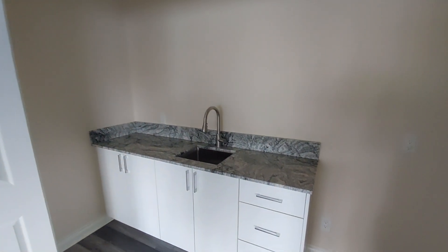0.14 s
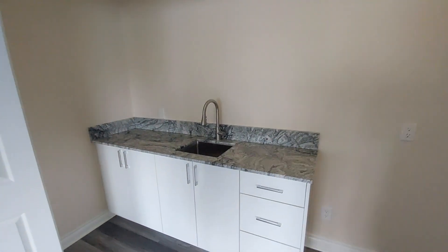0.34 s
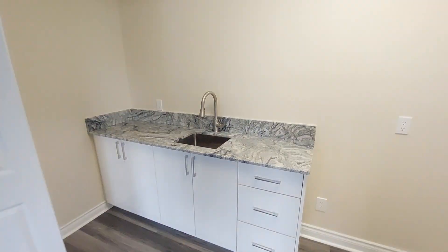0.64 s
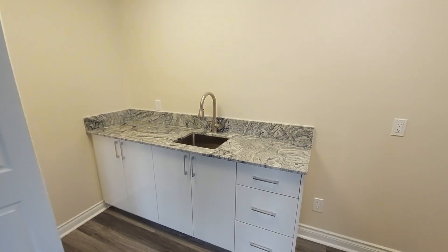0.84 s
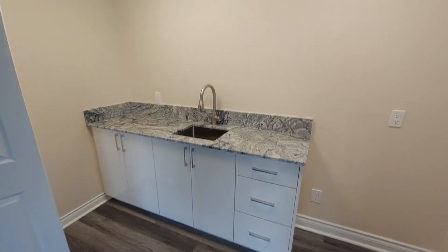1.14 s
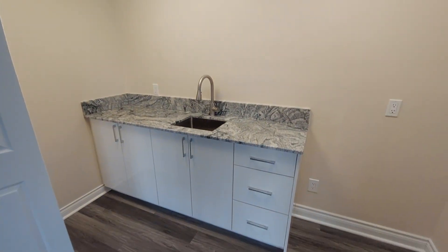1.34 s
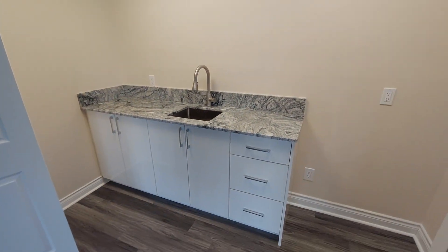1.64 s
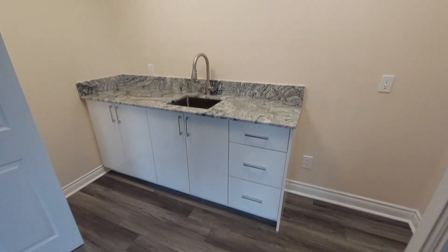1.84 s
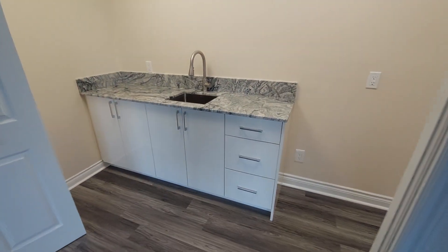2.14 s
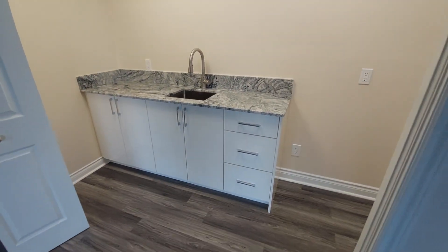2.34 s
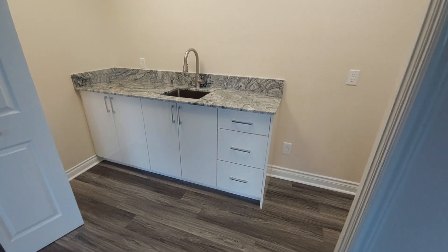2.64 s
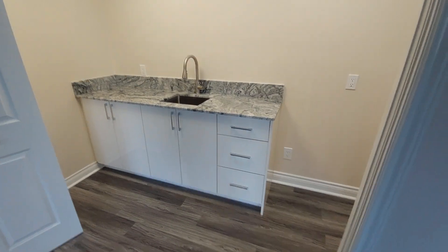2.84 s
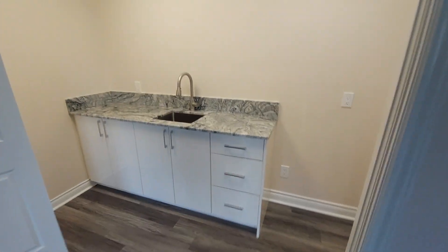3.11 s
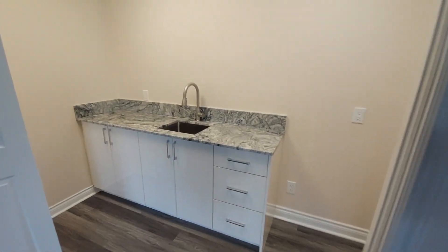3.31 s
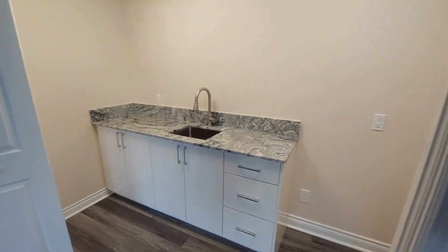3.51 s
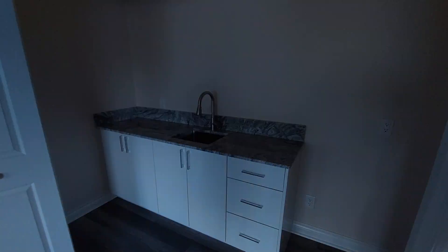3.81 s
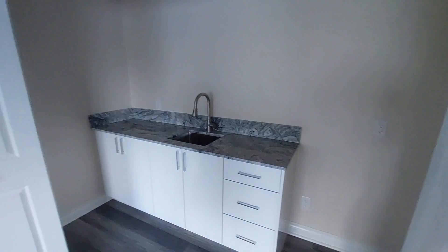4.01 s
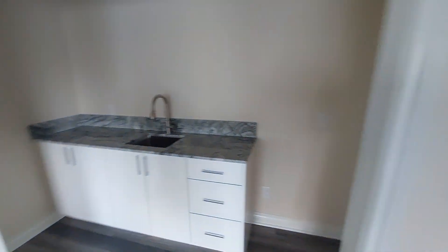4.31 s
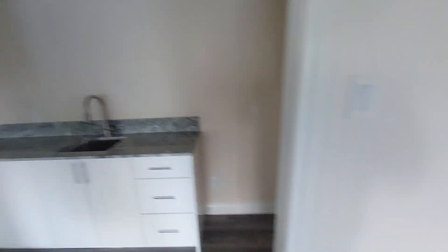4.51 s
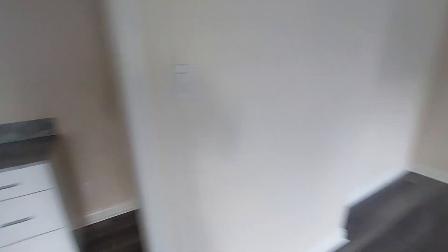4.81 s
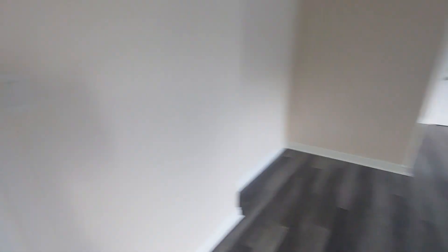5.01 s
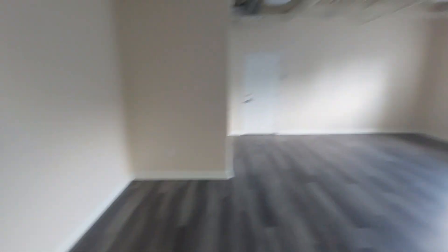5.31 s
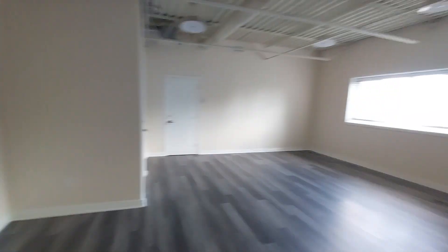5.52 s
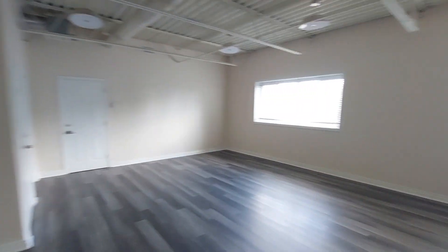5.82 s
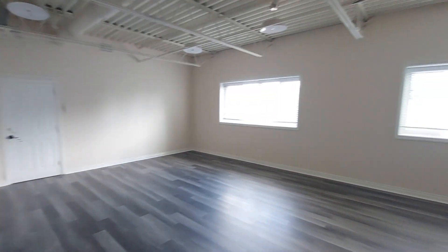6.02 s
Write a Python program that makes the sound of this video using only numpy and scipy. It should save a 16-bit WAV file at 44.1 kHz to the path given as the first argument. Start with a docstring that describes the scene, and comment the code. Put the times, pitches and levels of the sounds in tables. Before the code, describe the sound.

The dull ring of a switch fades in a bare room as close finger clicks and scrapes start on the left side of a handheld microphone. Slow, irregular footsteps knock and thump on a laminate floor. Past the middle come a light knock on a hollow wall and a crisp, echoing switch snap. Then a sleeve swishes, floor joints click and the grip slips loudly once more. Ventilation hums faintly throughout.

```python
"""Footsteps wander about an empty, echoing room: heels knock on laminate and the floor thumps.
The walker holds a recorder, so fingers tick, rub and creak on its case right beside the left microphone.
A dull switch snap rings away at the start; later a hand meets the hollow wall and a bright snap sets
the room ringing. Underneath lie the rustle of a sleeve and a faint ventilation hum."""
import sys
import numpy as np
from scipy import signal
from scipy.fft import rfft, irfft, next_fast_len
from scipy.io import wavfile

SR = 44100
rng = np.random.default_rng(int(sys.argv[2]) if len(sys.argv) > 2 else 0)


def master_out(mix):
    """Clip the mix to full scale and print it as 16-bit PCM to the path in sys.argv[1]."""
    frames = np.transpose(np.atleast_2d(mix))
    ceiling = np.clip(frames, -1, 1)
    pcm = np.round(ceiling * 32767).astype(np.int16)
    wavfile.write(sys.argv[1], SR, pcm)


N = 271215
T = np.arange(N) / SR

# Ring of the bare room. Each row: frequency in Hz, seconds to die away by 60 dB.
ROOM_DECAY = [(100, 1.25), (300, 1.06), (700, 1.11), (1700, 2.14), (3500, 1.544), (6500, 1.26),
              (12000, 0.71)]
# Stereo width of noise. Each row: frequency in Hz, likeness of left and right from 0 to 1.
STEREO_LIKENESS = [(50, 0.61), (200, 0.59), (500, 0.65), (1000, 0), (3000, 0), (16000, 0)]
# Colour of the ventilation's air. Each row: frequency in Hz, level in dB.
AIR_SPECTRUM = [(25, -24.5), (55, 2), (85, -3.5), (120, 3), (170, -4.5), (260, -4.5), (400, -14.5),
                (700, -28), (1800, -28), (3500, -31), (9000, -32), (16000, -34)]
# How much ventilation reaches the walker. Each row: time in seconds, level in dB.
VENT_REACH = [(0, -3), (.8, -2), (2.6, -0.5), (3.4, -0.5), (4.3, -3.5), (4.8, -7), (6.15, -8)]
# Colour of the sleeve's cloth. Each row: frequency in Hz, level in dB.
CLOTH_SPECTRUM = [(500, -5), (1000, 1), (1600, 8.5), (2800, 0.5), (4200, 2), (5700, -0.5), (7500, 0.5),
                  (9200, -7.5), (12000, 2), (16000, -1.5)]
# Swings of the arm. Each row: start in seconds, length in seconds, level in dB, left over right in dB.
ARM_SWINGS = [(0.322, 0.16, -68, -2), (1.785, 0.32, -65, 5), (2.044, 0.28, -57.5, 4.5),
              (2.588, 0.05, -63.5, 11), (3.533, 0.64, -54, 6.5), (4.173, 0.23, -65, -4),
              (4.528, 0.39, -58.5, -1), (4.849, 0.23, -54, 1.5), (5.094, 0.1, -53.5, -1),
              (5.52, 0.29, -59, 6), (5.658, 0.32, -61, 4), (5.92, 0.24, -50, 2.5)]
# The grip tightens. Each row: start in seconds, end in seconds, level in dB.
CASE_CREAKS = [(0.587, 0.608, -54.5), (1.408, 1.485, -51), (1.773, 1.798, -59), (2.886, 2.985, -43)]
# Fingers slide. Each row: start in seconds, end in seconds, level in dB, hiss over scrape in dB.
FINGER_RUBS = [(0.647, 0.771, -50.5, -3.5), (0.734, 0.852, -53, -10), (.815, .948, -38.5, -18),
               (1.004, 1.1, -56, -5.5), (1.396, 1.475, -53.5, -8), (1.773, 1.802, -44.5, -7),
               (1.94, 2.089, -54.5, 3), (2.623, 2.724, -52.5, -1.5), (2.892, 2.981, -50, -6),
               (5.387, 5.461, -47, -2)]
# A nail catches an edge of the case. Each row: start in seconds, level in dB.
NAIL_CATCHES = [(.594, -30), (.6663, -11), (5.3218, -28), (5.372, -11.5)]
# The grip slips. Each row: start in seconds, level in dB, ring pitch in Hz, crack over ring in dB.
GRIP_SLIPS = [(.1199, -20, 1710, -22), (.361, -23.5, 1870, -32), (0.7425, -14.5, 1290, -18),
              (0.8301, -25.5, 1310, -27), (0.8372, -24.5, 1310, -17), (1.303, -22.5, 1620, -4),
              (1.3448, -27, 1700, -10.5), (1.4112, -20, 1700, -6.5), (1.4161, -27.5, 1700, -9),
              (1.429, -25, 1730, -9), (1.4476, -19, 1490, -13), (1.4698, -14.5, 1500, -10.5),
              (1.7792, -25.5, 1520, -7), (1.7807, -24, 1810, -8.5), (2.1773, -21.5, 1450, -11.5),
              (2.2886, -27, 1500, -9), (2.6451, -28.5, 1350, -23), (2.8613, -22, 1660, 0),
              (2.8933, -21, 1920, 0), (2.9115, -20, 1700, 3), (2.9407, -28, 1410, -23),
              (2.9597, -19.5, 1870, -8.5), (5.233, -21.5, 1673, -3.5), (5.4199, -16.5, 1380, -2),
              (5.4306, -2.5, 880, -9.5), (5.438, -19.5, 1700, -20)]
# The hollow wall. Each row: resonance in Hz, width in Hz, level in dB.
WALL_RESONANCES = [(650, 28, 1.5), (736, 15.6, 7.5), (767, 62, -1), (1500, 1200, -16), (2420, 430, -10.5),
                   (2867, 220, -9.5), (3760, 390, -6), (5630, 1100, -16.5), (6780, 610, -12.5),
                   (12600, 2600, -22.5)]
# Light knocks on wall and door frame. Each row: start in seconds, level in dB.
WALL_KNOCKS = [(3.5797, -32), (3.589, -33.5), (4.862, -53.5)]
# A switch and its plate. Each row: resonance in Hz, width in Hz, level in dB.
SWITCH_RESONANCES = [(416, 84, -0.5), (1700, 540, -1), (2954, 670, 0.5), (3500, 370, 6.5), (4150, 197, 7),
                     (4480, 690, 0.5), (5384, 650, 2.5), (6294, 110, 11.5), (6523, 170, 8), (7630, 450, 3),
                     (8480, 190, -8.5), (10520, 1100, -5.5), (12030, 750, 0), (14700, 2500, -7.5)]
# Two switch snaps: a duller one ringing away at the start, then a bright one.
# Each row: start in seconds, level in dB, brightness as a cutoff in Hz.
SWITCH_SNAPS = [(-.36, -12, 4000), (3.829, -15, 15300)]
# Plank joints click. Each row: start in seconds, level in dB.
JOINT_CLICKS = [(5.0479, -37), (5.0711, -32)]
# Weight lands on the floor or pushes on the wall.
# Each row: start in seconds, level in dB, swell time in seconds, left over right in dB.
WEIGHT_THUMPS = [(2.217, -39, .014, 22.5), (2.283, -43.5, 0.0078, 18), (3.596, -41.5, .026, 1.5),
                 (3.841, -38, .033, 0), (4.48, -47.5, .018, -10), (4.559, -49.5, .008, -14),
                 (5.139, -52, .018, 8), (5.439, -56, .023, 28), (5.565, -53, .014, 21)]
# Heels on the planks. Each row: start in seconds, level in dB, brightness as a cutoff in Hz.
HEEL_STRIKES = [(-.1, -44, 557), (2.0794, -26.5, 1700), (3.0749, -56.5, 820), (3.579, -43.5, 690),
                (3.835, -38, 590), (4.461, -52.5, 840), (5.048, -52, 590), (5.202, -48.5, 860),
                (5.2928, -35, 1700), (5.928, -44, 660)]


def from_db(db):
    """Decibels as a gain."""
    return 10 ** (np.asarray(db) / 20)


def rms_one(x):
    """Scale to an rms of 1."""
    return x / np.sqrt(np.mean(x ** 2) + 1e-20)


def peak_one(x):
    """Scale to a peak of 1."""
    return x / np.abs(x).max()


def at_hz(points, hz):
    """Read a curve along a logarithmic frequency axis."""
    freqs, values = np.transpose(points)
    return np.interp(np.log(hz + 1), np.log(freqs), values)


def pan(db):
    """Stereo gains that put the left db above the right."""
    return from_db(np.array([[db], [-db]]) / 2)


def cut(x, hz, kind, order=2):
    """A low-pass or high-pass filter."""
    return signal.sosfilt(signal.butter(order, min(hz, .45 * SR), kind, fs=SR, output="sos"), x)


def resonate(x, hz, width_hz):
    """A resonance with gain 1 on top."""
    return signal.lfilter(*signal.iirpeak(min(hz, .45 * SR), hz / width_hz, fs=SR), x)


def resonate_twice(x, hz, width_hz):
    """Two like resonances in series: a softer attack and steeper skirts."""
    return resonate(resonate(x, hz, width_hz), hz, width_hz)


def click(size=4096):
    """One clean contact."""
    return signal.unit_impulse(size) + 1e-18


def burst(decay_s, size=4096):
    """A quickly dying spatter of tiny contacts, even in colour; energy 1."""
    fade = np.exp(-T[:size] / decay_s)
    phases = np.angle(rfft(rng.standard_normal(size) * fade))
    spatter = irfft(np.exp(1j * phases), size) * fade ** .25
    return spatter / np.linalg.norm(spatter)


def struck(contact, modes):
    """The modes of a body, rung by one contact; peak 1."""
    return peak_one(sum((-1) ** k * from_db(db) * resonate(contact, hz, width)
                        for k, (hz, width, db) in enumerate(modes)))


def add(out, s, sound):
    """Mix a sound in at s seconds; it may begin before the scene does."""
    at = round(s * SR)
    part = sound[:, max(-at, 0):N - at]
    out[:, max(at, 0):max(at, 0) + part.shape[1]] += part


def noise(spectrum, size=N):
    """Coloured stereo noise of rms 1, narrower in the bass."""
    n = next_fast_len(size)
    hz = np.arange(n // 2 + 1) * SR / n
    alike = np.clip(at_hz(STEREO_LIKENESS, hz), 0, 1)
    mid, side = rfft(rng.standard_normal((2, n)))
    both = np.sqrt(1 + alike) * mid + np.sqrt(1 - alike) * side * [[1], [-1]]
    return rms_one(irfft(both * from_db(at_hz(spectrum, hz)), n)[:, :size])


def room(x, near_db, near_t60, far_db, size=80000):
    """Dense echoes of the nearby walls, then the long ring of the whole room, dying band by band."""
    t = T[:size]
    white = rfft(noise([(20, 0), (20000, 0)], size=size))
    octave = np.log2(np.maximum(np.arange(white.shape[1]) * SR / size, 110) / 110)
    far = 0
    for k in range(9):
        band = irfft(white * (np.round(octave) == k), size)
        far = far + band * from_db(-60 * t / at_hz(ROOM_DECAY, 110 * 2 ** k))
    near = irfft(white, size) * from_db(-60 * t / near_t60)
    build_up = 1 - np.exp(-t / 0.005)
    echo = (from_db(near_db) * near + from_db(far_db) * far) * build_up / np.sqrt(SR / 20)
    return signal.fftconvolve(x[None], echo, axes=1)


def ventilation():
    """A fan tone and a mains tone waver over a soft rush of air, fading as the walker turns away."""
    fan_hz, mains_hz = 113.2, 240.3
    reach_db = np.interp(T, *np.transpose(VENT_REACH))
    out = from_db(-66.5 + 0.68 * reach_db) * noise(AIR_SPECTRUM) * pan(6.2)
    for hz, db, fade_depth, side_db in [(fan_hz, -65.5, 1.0, 7), (mains_hz, -68, 2.9, 2)]:
        waver = rms_one(resonate_twice(rng.standard_normal(N + SR), hz, 22)[SR:])
        tone = rms_one(np.sin(2 * np.pi * hz * T) + 0.35 * waver)
        out = out + from_db(db + fade_depth * reach_db) * tone * pan(side_db)
    return out


def sleeve():
    """Each swing of the arm is a swish of cloth that rises fast and dies away, brighter on the right."""
    rise_share, fall_db = 0.16, 9.5
    stir_db, moving_from_s = -69.5, 2.4  # cloth stirs faintly between the swings
    power = from_db(stir_db) ** 2 * (T > moving_from_s)
    for start, length, db, side_db in ARM_SWINGS:
        progress = np.maximum(T - start, 0) / length
        rise = np.minimum(progress / rise_share, 1)
        fall = np.maximum(progress - rise_share, 0) / (1 - rise_share)
        swish = rise * from_db(db - fall_db * np.minimum(fall, 4) ** 2)
        power = power + (swish * pan(side_db)) ** 2
    left, right = np.sqrt(power) * noise(CLOTH_SPECTRUM)
    return np.array([cut(left, 11000, "low"), right])


def pressure(length_s):
    """Finger pressure swells over a stroke and eases off after it."""
    swell = signal.windows.tukey(max(int(length_s * SR), 256), alpha=0.65)
    return cut(np.pad(swell, (0, 2048)), 58, "low", order=1)


def scrape(hz, size):
    """Dense uneven slips through one broad resonance; rms 1."""
    slips_per_s, spread_db = 9000, 4.1
    slips = rng.standard_normal((2, size)) * (rng.random(size) < slips_per_s / SR)
    slips *= from_db(spread_db * rng.standard_normal(size))
    rung = cut(resonate_twice(slips, hz, width_hz=hz), 1.715 * hz, "low", order=3)
    return rms_one(cut(rung, 0.45 * hz, "high", order=1))


def creaks():
    """The squeezed case creaks low with a faint rasp, and both microphones hear it."""
    out = np.zeros((2, N))
    for start, end, db in CASE_CREAKS:
        squeeze = pressure(end - start)
        groan = scrape(hz=410, size=len(squeeze))
        rasp = from_db(-8) * scrape(hz=1180, size=len(squeeze))
        add(out, start, squeeze * from_db([[db], [db - 4.5]]) * (groan + rasp))
    return out


def rubs():
    """Sliding skin scrapes through the left microphone port's resonance, with a fine hiss on top."""
    out = np.zeros((2, N))
    for start, end, db, hiss_db in FINGER_RUBS:
        stroke = pressure(end - start)
        hiss = noise([(600, -10), (2500, 9.5), (5500, 5), (9000, -1), (13000, 1), (16000, -7)],
                     size=len(stroke))
        rub = scrape(hz=1520, size=len(stroke)) + from_db(hiss_db) * hiss
        add(out, start, stroke * from_db([[db], [db - 47]]) * rub)
    return out


def nail_clicks():
    """A nail catches the case: a thin, very high click on the left."""
    out = np.zeros((2, N))
    for s, db in NAIL_CATCHES:
        edge = resonate(click() + 0.18 * burst(0.00097), hz=12800, width_hz=3300)
        thin = peak_one(cut(edge, 5100, "high", order=6))
        add(out, s, from_db(db) * thin * from_db([[0], [-34]]))
    return out


def grip_ticks():
    """Skin slips on the case: a brief ring, a crack and a push of air on the left, a thud on both sides."""
    usual_db, usual_width_hz = -23.5, 940
    out = np.zeros((2, N))
    thud = peak_one(resonate_twice(click(), hz=424, width_hz=480))
    push = peak_one(cut(resonate(click(), hz=390, width_hz=380), 900, "low"))
    for s, db, hz, crack_db in GRIP_SLIPS:
        # a firmer finger damps the ring; so does a slip with less crack, as the skin stays on the case
        width_hz = usual_width_hz * from_db(0.24 * (db - usual_db) - 0.12 * crack_db)
        ring = peak_one(resonate_twice(click(), hz, width_hz))
        # slow slips are round at the top and move the most air
        ring = peak_one(cut(ring, 2.24 * hz, "low", order=3))
        air = from_db(-14) * (1000 / hz) ** 2.2 * push
        edge = click() + 0.53 * burst(0.0012)
        crack = peak_one(cut(cut(edge, 3750, "high", order=4), 3700, "low", order=1))
        tick = ring + air + from_db(crack_db) * crack
        add(out, s, from_db(db) * tick * from_db([[0], [-34]]))
        add(out, s + 0.00068, from_db(-41.5 + 0.8 * crack_db) * thud * pan(-1))
    return out


def wall_knocks():
    """A hand meets the hollow wall, and the room answers."""
    out = np.zeros((2, N))
    for s, db in WALL_KNOCKS:
        knock = from_db(db) * struck(burst(0.0017), WALL_RESONANCES)
        add(out, s, knock * pan(0))
        add(out, s, room(knock, near_db=6, near_t60=0.44, far_db=2.5) * pan(1))
    return out


def switch_snaps():
    """A rocker snaps over, chatters for a few milliseconds and sets the room ringing."""
    out = np.zeros((2, N))
    for s, db, bright_hz in SWITCH_SNAPS:
        chatter = struck(burst(0.0084), SWITCH_RESONANCES)
        snap = from_db(db) * cut(chatter, bright_hz, "low", order=3)
        add(out, s, snap * pan(-4))
        # the sharpest treble lands far to the right
        sizzle = cut(burst(0.0023), 10700, "high", order=4)
        add(out, s, from_db(db + 14) * sizzle * from_db([[-14], [8]]))
        # the walls return the ring of the plate from all sides
        plate = struck(click(), SWITCH_RESONANCES)
        plate *= np.linalg.norm(chatter) / np.linalg.norm(plate)
        ring = from_db(db) * cut(plate, bright_hz, "low", order=4)
        add(out, s, room(ring, near_db=-12.5, near_t60=0.117, far_db=1.5) * pan(1.3))
    return out


def plank_joints():
    """Joints in the laminate click underfoot, off to the right."""
    out = np.zeros((2, N))
    ring = resonate(click(), hz=1500, width_hz=1197) + .5 * resonate(click(), hz=5800, width_hz=1200)
    for s, db in JOINT_CLICKS:
        tick = from_db(db) * peak_one(cut(ring, 5200, "low", order=4))
        add(out, s, tick * pan(-10.5))
        add(out, s, room(tick, near_db=-14, near_t60=0.81, far_db=-1))
    return out


def thumps():
    """Under the walker's weight the floor or wall swings for a few slow cycles, with a low rumble."""
    usual_hz, usual_swell_s = 62.9, 0.0198
    out, t = np.zeros((2, N)), T[:SR // 2]
    for s, db, swell_s, side_db in WEIGHT_THUMPS:
        swell = t / swell_s * np.exp(1 - t / swell_s)
        rumble = noise([(20, -15), (60, 0), (105, 1), (300, -24), (1500, -69)], size=len(t))
        hz = usual_hz * (usual_swell_s / swell_s) ** 0.226  # a shorter thump is higher
        phase = 2 * np.pi * hz * t
        swing = 0.87 * np.sin(phase) + 0.37 * np.sin(2 * phase) + 0.57 * rumble
        add(out, s, from_db(db) / 2 * swell * swing * pan(side_db))
    return out


def footsteps():
    """A heel gives a dull knock with a little grit; most of it arrives by way of the walls."""
    out = np.zeros((2, N))
    for s, db, bright_hz in HEEL_STRIKES:
        knock = cut(cut(click(), bright_hz, "low", order=5), 163, "high")
        hollow = 0.61 * resonate(knock, hz=220, width_hz=280)  # body of the floating planks
        grit = from_db(-15.5) * cut(burst(.002), 2500, "high")
        step = from_db(db) * (peak_one(knock + hollow) + grit)
        add(out, s, step * pan(2.3))
        add(out, s, from_db(5) * room(step, near_db=-5, near_t60=0.44, far_db=0) * pan(2.8))
    return out


def scene():
    """The walker, the hand on the case and the room's hum."""
    hand = grip_ticks() + nail_clicks() + rubs() + creaks()
    # the hand's small noises barely wake the room
    hand = hand + room(hand[0], near_db=-25, near_t60=0.16, far_db=-45.5)[:, :N]
    walker = footsteps() + thumps() + switch_snaps() + wall_knocks() + plank_joints() + sleeve()
    return walker + hand + ventilation()


def record(dry):
    """A steep low-pass shaves off the very top."""
    cutoff_hz = 16400
    return signal.sosfilt(signal.ellip(10, .1, 80, cutoff_hz, fs=SR, output="sos"), dry)


dry = scene()
out = record(dry)
master_out(out)
```